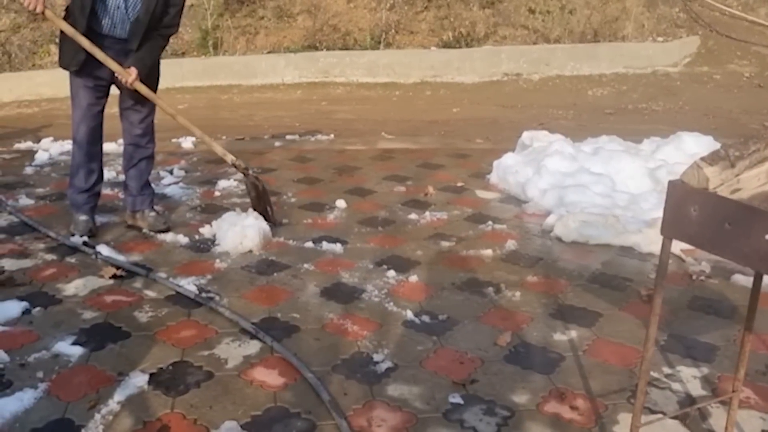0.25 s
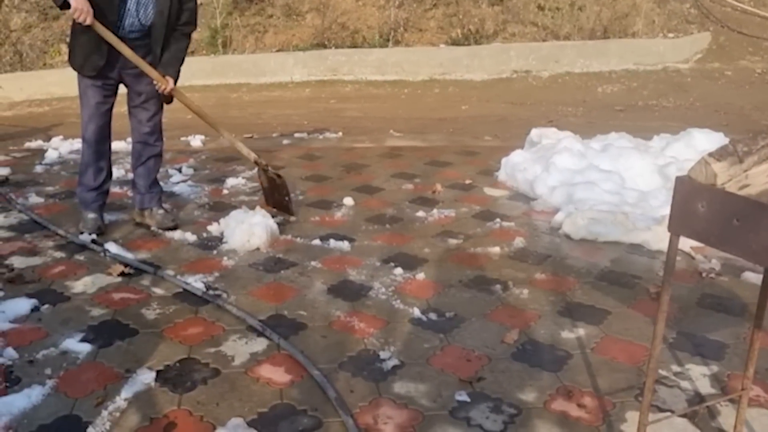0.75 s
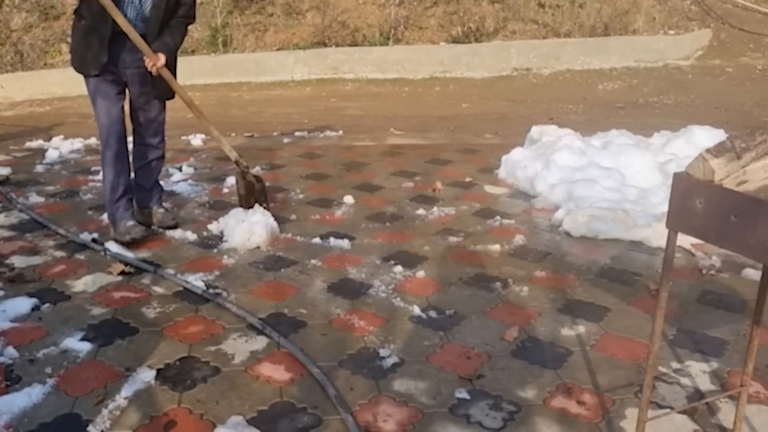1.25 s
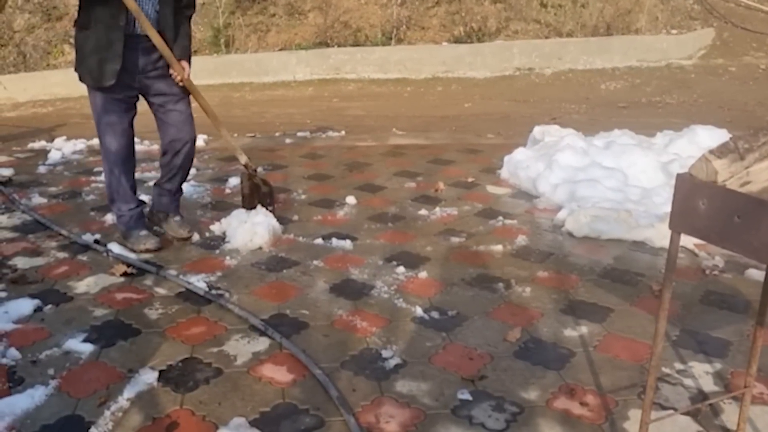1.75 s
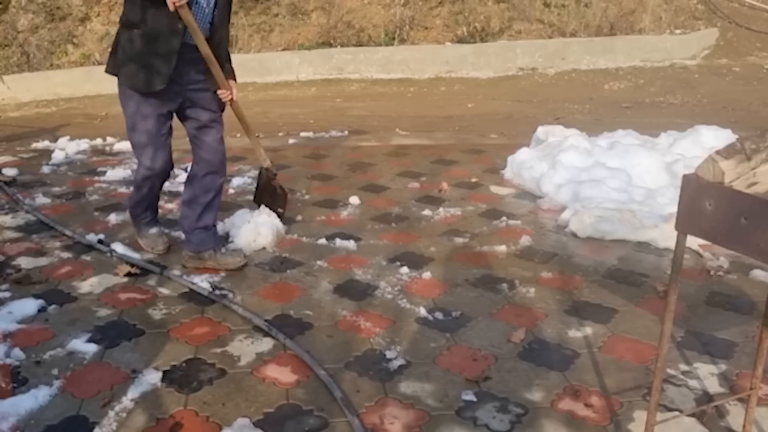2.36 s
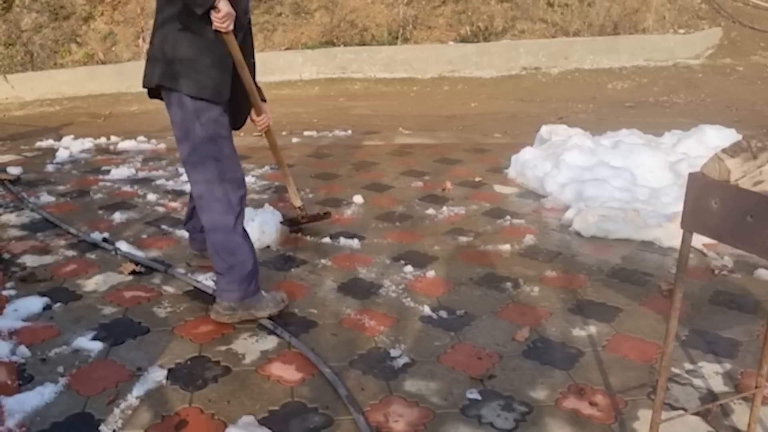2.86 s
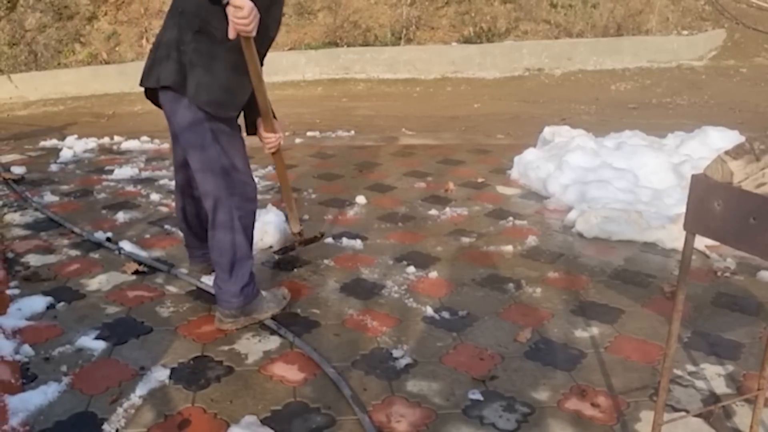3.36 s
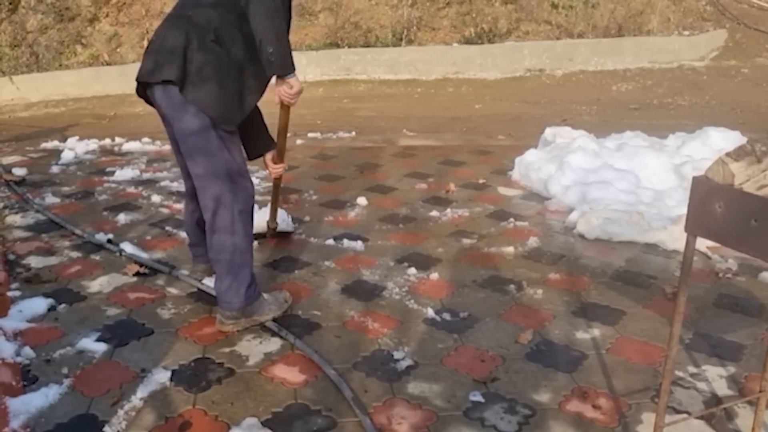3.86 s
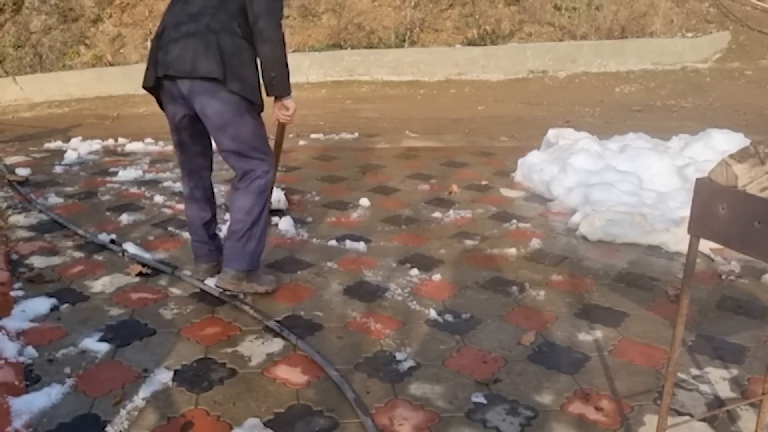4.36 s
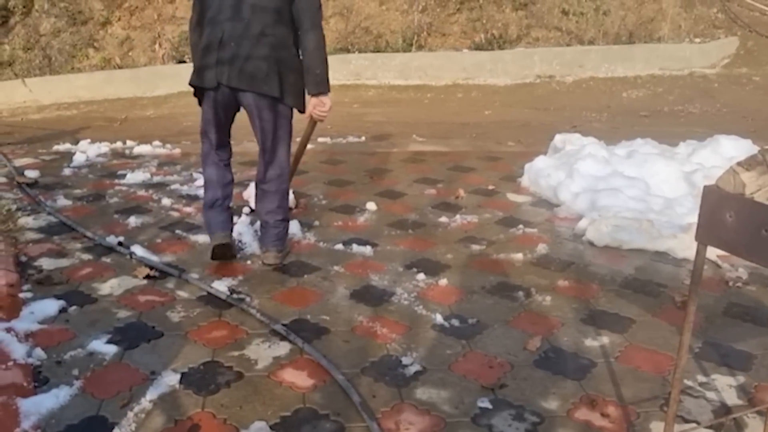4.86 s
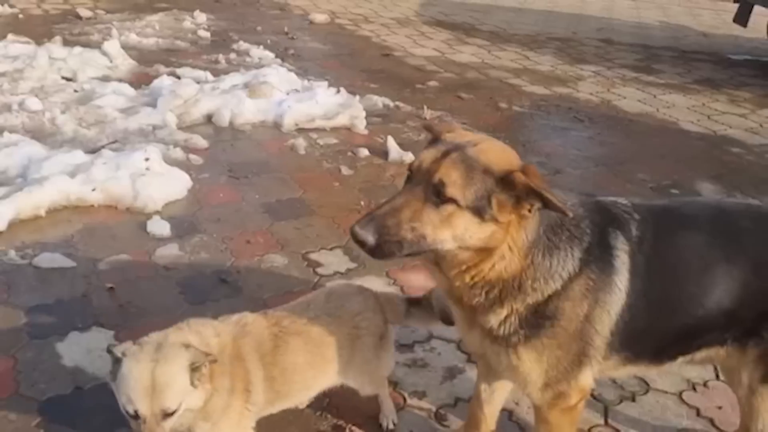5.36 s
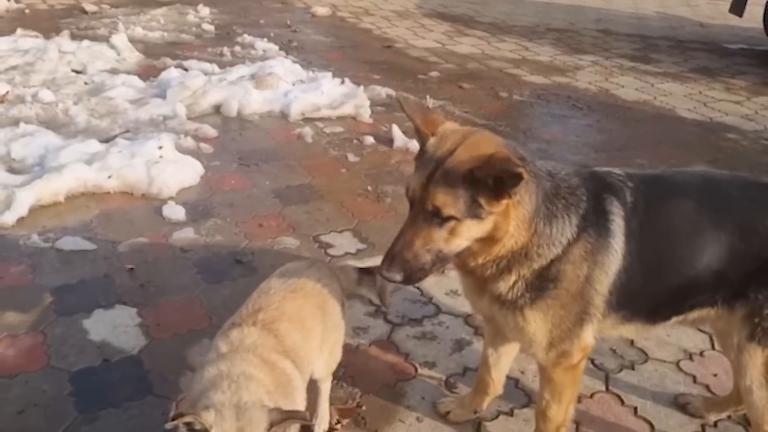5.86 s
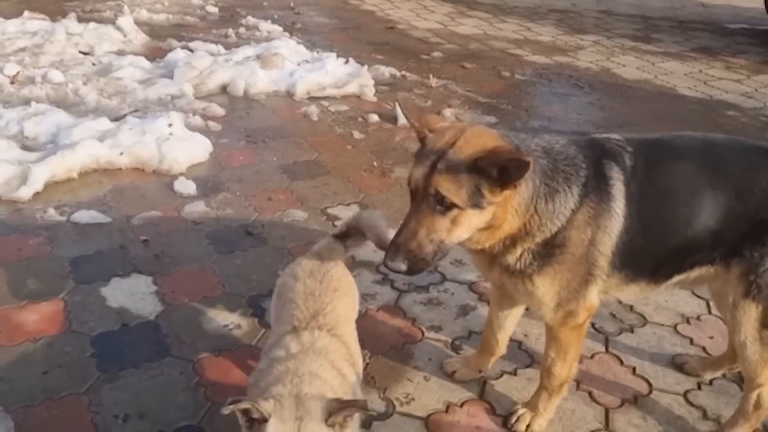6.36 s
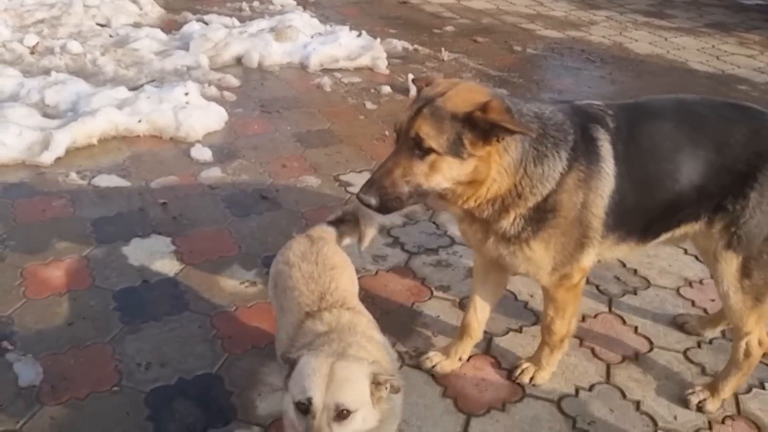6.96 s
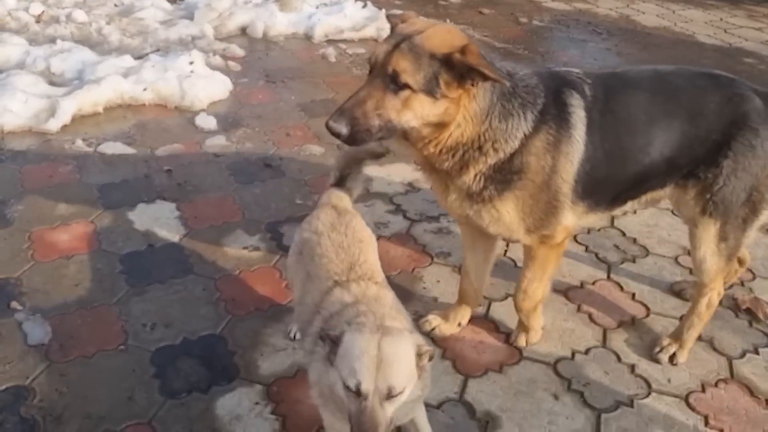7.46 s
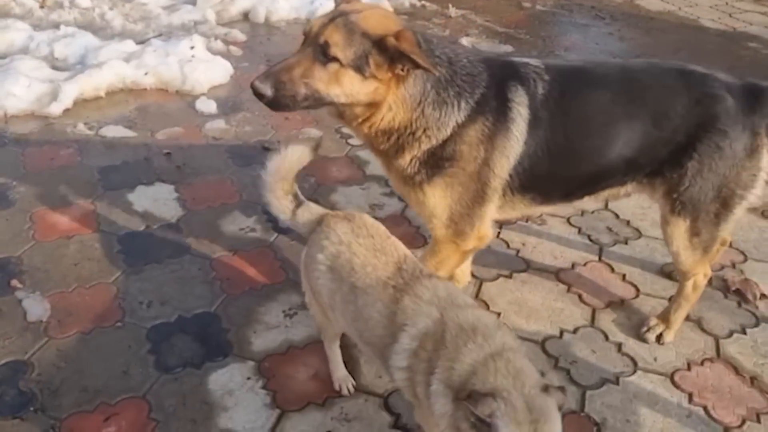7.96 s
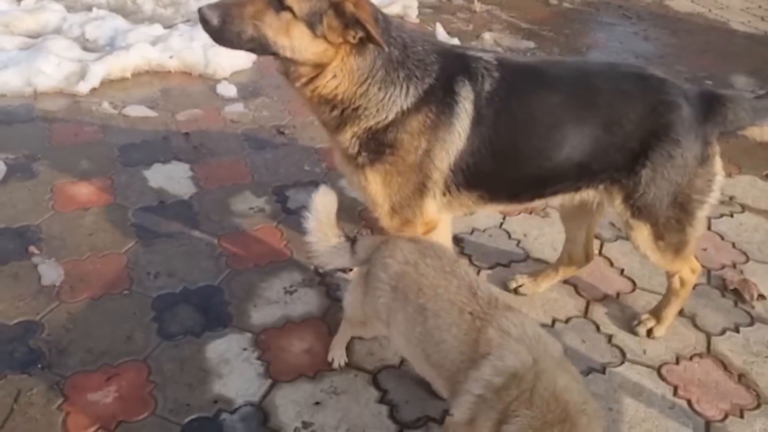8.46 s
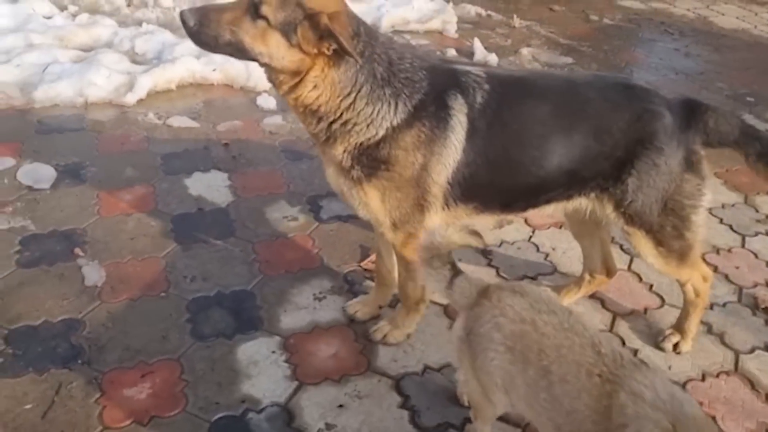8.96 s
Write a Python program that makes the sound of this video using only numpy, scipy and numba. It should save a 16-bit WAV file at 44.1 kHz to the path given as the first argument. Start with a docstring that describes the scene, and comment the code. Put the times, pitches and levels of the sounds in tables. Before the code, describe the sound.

Loud gritty shovel scrape on stone, then small crunches, a short ringing drag and more scattered scrapes, over soft wind outdoors.

```python
"""A steel shovel scrapes wet snow over paving stones in a yard, under a light wind and a distant hush.
From half a second in, a few steps away on one side, grit hisses and the edge jolts over joints and lumps.
Dull low thumps and crunches fall during and between strokes; from 2.4 to 4.4 s drags let the blade sing in
a sliding band. From 5.42 s the shovel is heard from farther round. Noise grains drive resonances of blade
and load; wind is low noise on two microphone ports that sit a hand's width apart on one body."""
import sys
import numpy as np
from scipy import signal
from scipy.fft import rfft, irfft, next_fast_len
from scipy.io import wavfile
from numba import njit

SR = 44100
rng = np.random.default_rng(int(sys.argv[2]) if len(sys.argv) > 2 else 0)


def materialize(psi):
    """Save the field psi as 16-bit PCM at rate SR to the path in sys.argv[1].

    A 1-D psi becomes a single channel; in a 2-D psi each row is a channel.
    """
    bounded = np.clip(np.atleast_2d(psi).T, -1, 1)
    quanta = np.round(bounded * 32767).astype(np.int16)
    wavfile.write(sys.argv[1], SR, quanta)


N = 406161
PAD = next_fast_len(N + SR // 2)  # FFT length with room for tails
HZ = np.maximum(np.arange(PAD // 2 + 1) * SR / PAD, 1)
TURN_S = 5.42  # from here the shovel is farther round


def from_db(db):
    """Amplitude ratio of a level: 20 dB for each factor of ten."""
    return 10 ** (np.asarray(db) / 20)


def rms_one(x):
    """Normalise by the root mean square, so that levels set the effective amplitude."""
    return x / np.sqrt(np.mean(x ** 2) + 1e-20)


def in_time(rows):
    """Linear interpolation of a (time [s], ...) table: one curve per column, one value per sample."""
    s, *columns = np.transpose(rows)
    return [np.interp(np.arange(N) / SR, s, column) for column in columns]


def at_hz(points, column=1):
    """Interpolation of a frequency table over log frequency, on the FFT grid."""
    points = np.array(points)
    return np.interp(np.log(HZ), np.log(points[:, 0]), points[:, column])


def colour(x, spectrum):
    """Minimum-phase filter: folding the cepstrum makes it causal; white noise keeps its rms."""
    magnitude = rms_one(from_db(at_hz(spectrum)))
    cepstrum = irfft(np.log(magnitude), PAD)
    cepstrum[1:PAD // 2] *= 2
    cepstrum[PAD // 2 + 1:] = 0
    response = np.exp(rfft(cepstrum))
    return irfft(rfft(x, PAD) * response, PAD)[..., :N]


def drift(rate):
    """Low-passed noise of rms 1: a double pole at rate [Hz] leaves only slow fluctuation."""
    r = np.exp(-40 * np.pi * rate / SR)  # computed at every 20th sample
    noise = rng.standard_normal(N // 20 + 2002)
    slow = rms_one(signal.lfilter([1], [1, -2 * r, r * r], noise)[2000:])
    return np.interp(np.arange(N) / 20, np.arange(len(slow)), slow)


def grains(per_s, spread_db):
    """Shot noise: random clicks of uneven size and either sign, scaled to rms 1."""
    sizes = from_db(spread_db * np.minimum(rng.exponential(1, N), 5))
    signs = rng.choice([-1, 1], N)
    return rms_one(sizes * signs * (rng.random(N) < per_s / SR))


@njit
def sliding(x, hz, q, sr):
    """State-variable band-pass with a centre that moves sample by sample; unit gain at resonance."""
    out, low, band = np.zeros(len(x)), 0., 0.
    for i in range(len(x)):
        g = np.tan(np.pi * hz[i] / sr)
        step = (x[i] - band * (1 / q + g) - low) * g / (1 + g / q + g * g)
        out[i] = (band + step) / q
        low += 2 * g * (band + step)
        band += 2 * step
    return out


def resonance(x, hz, width):
    """Damped oscillator: two poles whose radius sets the bandwidth; near unit gain at resonance."""
    r = np.exp(-np.pi * width / SR)
    poles = [1, -2 * r * np.cos(2 * np.pi * hz / SR), r * r]
    return signal.lfilter([1 - r, 0, r - 1], poles, x + 1e-18)


def yard_hush():
    """Broadband ambience: three independent coloured noises of rms 1."""
    # distant hush: (frequency [Hz], relative density [dB per Hz])
    hush_colour = [(71, -15), (120, -1), (222, -7), (327, -1), (445, -9), (684, -3), (968, -9.5),
                   (4230, -11), (7200, -21), (7980, -23), (8660, -79), (12800, -24), (16000, -65)]
    return colour(rng.standard_normal((3, N)), hush_colour)


def wind():
    """Turbulent pressure: lumpy low noise, only partly correlated between the two ports."""
    # course of the wind: (time [s], relative level [dB])
    wind_course = [(0.0, -62.5), (0.41, -49), (0.49, -61), (0.54, -51), (0.59, -56.5), (0.87, -51),
                   (0.92, -61.5), (1.79, -70.5), (1.87, -61.5), (3.51, -73), (3.67, -66), (3.72, -77),
                   (5.49, -64.5), (5.57, -73), (6.18, -70), (6.54, -86), (6.62, -62), (6.69, -71),
                   (7.57, -72), (7.75, -61), (7.77, -68.5), (8.31, -74.5), (8.54, -45.5), (8.57, -50),
                   (8.95, -67.5), (9.21, -50)]
    # wind noise at the ports: (frequency [Hz], relative density [dB per Hz])
    wind_colour = [(12, -9), (20, -11), (75, 2), (161, -27), (195, -50.5), (226, -64.5), (308, -25.5),
                   (348, -65.5), (500, -58.5), (650, -68), (1100, -120)]
    level_db, = in_time(wind_course)
    separate = rng.standard_normal((2, N))
    shared = .5 * rng.standard_normal(N)
    lumps = from_db(2.3 * np.array([drift(24), drift(12)]))
    gust_db = 1.5 * drift(7)
    lean_db = 4 * drift(2.4) * [[.5], [-.5]]  # gusts lean to one port
    rumble = rms_one(colour(separate + shared, wind_colour) * lumps)
    return rumble * from_db(level_db + 3.5 + gust_db + lean_db)


def thumps():
    """Damped free vibration: a soft low push rings as a decaying sine."""
    # dull low thumps: (time [s], level [dB], frequency [Hz], t60 [s])
    thump_list = [(.526, -13.5, 297.4, 0.051), (1.281, -46.5, 205, 0.068), (2.302, -38, 261, 0.067),
                  (2.857, -33, 247, 0.038), (3.647, -34, 243, .06), (3.758, -25.5, 198, 0.03),
                  (3.995, -48, 99, 0.15), (5.259, -45, 297, 0.065), (6.134, -38.5, 147, 0.056),
                  (6.6, -38, 98, 0.12), (6.652, -40, 174, 0.051), (7.994, -30.5, 304.6, .05),
                  (9.099, -45.5, 276, 0.069)]
    rise_s = 0.0014
    out, t = np.zeros(N + SR), np.arange(SR // 4) / SR
    for s, db, hz, t60 in thump_list:
        envelope = np.minimum(t / rise_s, 1) * from_db(db - 60 * t / t60)
        start = round(s * SR)
        out[start:start + len(t)] += envelope * np.sin(2 * np.pi * hz * t)
    return out[:N]


def drag():
    """Friction-driven resonance: dense grit excites bands that slide together as the blade tilts."""
    # drags that leave the blade free to sing: (time [s], band centre [Hz], relative level [dB])
    drag_course = [(2.45, 1147, -84), (2.55, 1165, -65), (2.65, 1110, -61.5), (2.75, 1032, -66.5),
                   (2.84, 998, -78), (2.88, 1372, -62.5), (2.95, 1230, -69), (3.03, 1225, -82),
                   (3.08, 1242, -78), (3.36, 1090, -78), (3.43, 1090, -50.5), (3.55, 1087, -37.5),
                   (3.7, 1166, -36.5), (3.8, 1193, -53), (3.9, 1147, -56.5), (3.98, 1119, -58.5),
                   (4.06, 1007, -61), (4.15, 918, -66), (4.24, 1045, -81), (4.36, 1007, -97)]
    # bands that slide together: (multiple of the centre [1], relative level [dB], sharpness Q [1])
    drag_bands = [(.58, 6, 8), (1, 8, 9), (3.3, 4, 11)]
    hz, level_db = in_time(drag_course)
    grit = grains(9000, spread_db=1.5)
    song = np.zeros(N)
    for multiple, db, q in drag_bands:
        song += from_db(db) * rms_one(sliding(grit, multiple * hz, 1. * q, SR))
    return from_db(level_db) * song


def rubbing():
    """Friction noise envelopes: gains of grit, fine grit, slush and spray under strokes and scuffs."""
    # long strokes, one curve each: (time [s], relative grit level [dB],
    # fine grit [dB above grit], slush [dB above grit], spray [dB above grit])
    stroke_curves = [
        [(0.5, -90, 12, 14, -15), (0.53, -20.5, -6.5, -9.5, -20), (0.572, -42, -8, 12, -22),
         (0.596, -21.5, -12, -5.5, -23.5), (0.732, -21.5, -8, -4, -18), (0.752, -34.5, -9, 9, -21),
         (0.764, -24.5, -1, -3, -15), (0.792, -25, -7, -1, -14.5), (0.944, -60.5, 0.5, 8.5, -17),
         (1.02, -71.5, -10, -21, -19.5)],
        [(2.4, -66, -6, 5, -21), (2.58, -57, 9, 2, -12), (2.712, -52, -2, 5.5, -14),
         (2.73, -39.5, -3.5, 1.5, -22), (2.806, -60, 7, 3, -7), (2.85, -54, 2, 2, -9),
         (2.882, -32, -22, -18, -43), (2.902, -55.5, 4, 10, -4), (2.956, -39, -2, -1, -9.5),
         (3.08, -64.5, -2, 2.5, -23)],
        [(3.3, -56, 3, 2, -15), (3.32, -95, -4, 0, 1), (3.334, -46, -10.5, 0.5, -16),
         (3.378, -51.5, 1.5, -11, -17), (3.484, -33.5, 0, 4.5, -13), (3.584, -29, 4.5, -6, -10),
         (3.604, -21, -2, -14, -15), (3.628, -28, 5, 6.5, -6.5), (3.748, -27.5, -4.5, 1.5, -19),
         (3.84, -48.5, -2, 7, -18)],
        [(3.84, -47, -3, -9, -18), (3.918, -52, 8, -6, 2), (3.934, -54.5, 6, 2, -7), (3.956, -48, 7.5, -8, -5),
         (4.038, -62, -5, 2, -14), (4.064, -51, 3.5, -12, -9), (4.144, -57, -9, 1, -24),
         (4.162, -58.5, 5.5, 2, -16.5), (4.35, -63, -2, 2, -22), (4.42, -67, -6, 8, -40.5)],
        [(6.16, -52, 2, 2, -20), (6.172, -61, -2.5, -2.5, -20), (6.334, -44, -2, -19, -19),
         (6.394, -37.5, -4.5, -9, -19.5), (6.484, -49, 7, -15.5, -10), (6.52, -37.5, -4.5, -36, -16.5),
         (6.614, -36.5, -0.5, -8, -18.5), (6.746, -48.5, -3.5, -15, -19), (6.816, -55, 2.5, -1, -9),
         (6.84, -44, -4, -6, -25)],
        [(7.68, -58, -3, -4.5, -25), (7.742, -45.5, -1.5, -10, -20), (7.804, -39, -4.5, -6, -21),
         (7.824, -49.5, -1, -4.5, -17), (7.876, -37, 1, -4.5, -19), (7.932, -33, -1, 0, -18),
         (7.98, -31.5, 0, -3.5, -16), (7.996, -21, -10, -5.5, -20), (8.004, -30, 4, 9, -17),
         (8.02, -35, 5, -3, -15)],
        [(8.02, -27.5, 0, -6, -20), (8.036, -30, -1, -4, -15), (8.14, -27.5, -4, -2.5, -22),
         (8.24, -46, -1.5, -4.5, -19), (8.286, -60, 4.5, -6.5, -7), (8.422, -59, 2, -13, -8.5),
         (8.454, -45, -18, -19, -30), (8.5, -85.5, 8, -7, 1)],
    ]
    # short scuffs: (start [s], hold [s], fade t60 [s], relative grit level [dB],
    # fine grit [dB above grit], slush [dB above grit], spray [dB above grit])
    scuff_list = [(0, 0.062, 1.05, -62.5, -0.5, -6, -14), (1.153, 0.042, 0.5, -50, -2.5, -1, -21),
                  (1.258, 0.017, 0.17, -66.5, -7, 1, -23), (1.402, 0.048, 0.18, -59.5, -3, 1, -19),
                  (1.468, 0.013, 0.29, -45.5, -5, 12, -21), (1.578, .07, .15, -61, 8, 0, -6),
                  (1.698, 0.056, 0.22, -53.5, -7, 6.5, -18), (1.828, .03, 0.16, -58.5, 7, 2.5, -4.5),
                  (1.888, 0.053, .2, -61, -6, 8.5, -30), (1.952, 0.045, 0.17, -48, 1.5, 6, -16),
                  (2.038, 0.073, 0.47, -58, 1, -9.5, -16), (2.298, 0.095, 0.12, -57.5, -3, 3.5, -23.5),
                  (3.115, .14, 0.1, -51, -6.5, -9.5, -18), (4.439, 0.08, 0.19, -55.5, 12.5, 3, -3.5),
                  (4.638, 0.067, 0.29, -56, -5, -1, -25.5), (4.978, 0.028, 0.94, -64, -8, -1.5, -25.5),
                  (5.173, 0.077, 0.22, -52.5, 2, -3, -15), (5.258, 0.083, 0.87, -50.5, -16, -4.5, -21),
                  (5.588, 0.095, 0.39, -60, 5.5, -10.5, -10.5), (5.818, 0.026, 0.11, -61.5, 3, -14, -22),
                  (6.043, 0.063, 0.19, -43, -2.5, -11, -24), (6.831, 0.035, 0.56, -49.5, -3, -1, -17),
                  (6.998, 0.18, 0.14, -45.5, -6, -10.5, -22), (7.2, 0.043, 0.34, -65, 5.5, 1.5, -15.5),
                  (7.56, 0.029, 0.48, -47.5, -5, -10.5, -23), (8.884, 0.014, 0.13, -62.5, 13.5, -3.5, -5.5),
                  (9.028, 0.04, 0.21, -52.5, 3.5, 3, -20), (9.099, 0.027, 0.32, -48.5, -6.5, 1, -23)]
    rise_s = 0.014
    t, out = np.arange(N) / SR, np.zeros((4, N))

    def layers(grit_db, fine_db, slush_db, spray_db):
        """Level addition: four gains from one level and three offsets."""
        return from_db([grit_db, grit_db + fine_db, grit_db + slush_db, grit_db + spray_db])

    for rows in stroke_curves:
        out += layers(*in_time(rows)) * (t >= rows[0][0]) * (t < rows[-1][0])
    for s, hold, fade, grit_db, *above_db in scuff_list:
        at = slice(round(max(s, 0) * SR), round((s + hold + fade) * SR))
        since = t[at] - s
        shape = np.clip(since / rise_s, 0, 1) ** 2
        fall_db = -60 * np.maximum(since - hold, 0) / fade
        out[:, at] += shape * layers(grit_db + fall_db, *above_db)
    return out


def jolts(lumps, rise, thud_longer, knock_db, knock_q):
    """Impact: a first tick, envelopes of crack, thud and fine top, and a resonant knock; lows last longer."""
    # jolts and crunches: (time [s], relative level [dB], thud [relative dB above the crack],
    # thud frequency [Hz], fine top [dB above the crack], crack t60 [s])
    jolt_list = [(0.5254, -9, -3.5, 308, -32, 0.037), (0.5821, -10.5, -17, 254, -21, 0.032),
                 (0.596, -22, -11, 318, -35, 0.028), (0.6937, -20, -17, 550, -24, 0.017),
                 (0.7224, -4, -15, 260, -28, 0.032), (0.7647, -4.5, -9.5, 1330, -25, 0.021),
                 (0.7774, -6, -21, 546, -28, 0.031), (0.7888, -0.5, -29, 363, -35, 0.022),
                 (0.822, -9, -16.5, 387, -20, 0.062), (0.8548, -19.5, -9.5, 715, -18, 0.061),
                 (1.1568, -36.5, -25, 581, -16, 0.041), (1.282, -29, -12.5, 300, -20, 0.015),
                 (1.327, -41.5, -19.5, 323, -41, 0.083), (1.4032, -40.5, -3.5, 245, -37, 0.033),
                 (1.432, -38, -8, 350, -37, 0.075), (1.48, -27, -11, 606, -46, 0.031),
                 (1.496, -26.5, -4.5, 596, -41, 0.02), (1.6217, -41.5, -12, 1150, -4, 0.091),
                 (1.6781, -18.5, -19.5, 310, -28, 0.058), (1.7087, -12.5, -13, 545, -26, 0.025),
                 (1.7504, -50, 6, 1280, -33, 0.032), (1.7663, -27.5, -22, 1230, -36, 0.023),
                 (1.799, -41, -15, 544, -29, 0.045), (1.831, -33, -11.5, 218, -25, 0.023),
                 (1.9797, -29.5, -21.5, 1390, -31, 0.08), (2.0681, -32.5, -22, 323, -17, 0.012),
                 (2.0925, -42, -22, 228, -21, 0.035), (2.1311, -41.5, -7, 256, -27, 0.042),
                 (2.2998, -34.5, 1.5, 294, -39, 0.074), (2.345, -36, -17, 1130, -34, 0.069),
                 (2.3885, -44.5, -2, 535, -31, 0.035), (2.4713, -48, 3, 544, -18, 0.11),
                 (2.5597, -33, -23, 1340, -31, 0.04), (2.5874, -44, 0.5, 662, -31, 0.044),
                 (2.6544, -37, -16, 697, -23, 0.065), (2.723, -30, -21, 654, -29, 0.045),
                 (2.7474, -33, -18, 1140, -27, 0.02), (2.8576, -33.5, -4.5, 260, -35, 0.035),
                 (2.8769, -25, -33, 1370, -37, 0.012), (3.0893, -35.5, -13, 242, -40, 0.038),
                 (3.1288, -35.5, -12, 581, -42, 0.025), (3.2054, -34, -9, 660, -13, 0.035),
                 (3.3313, -22, -9, 560, -21, 0.049), (3.407, -16.5, -10.5, 665, -23, 0.05),
                 (3.4632, -17.5, -25, 1110, -21, 0.042), (3.476, -18, -11, 619, -23, 0.028),
                 (3.5363, -6.5, -10.5, 600, -21, 0.029), (3.6044, -1, -5, 614, -32, 0.012),
                 (3.6198, -3, -11.5, 1080, -28, 0.012), (3.648, -9.5, -8, 330, -26, 0.023),
                 (3.7616, -31, 2, 1160, -37, 0.018), (3.8896, -34, -22, 1300, -12, 0.028),
                 (4.2437, -35.5, -16, 1160, -35, 0.028), (4.4377, -37.5, -11.5, 686, -16.5, 0.026),
                 (4.4523, -45.5, -8, 640, -27, 0.051), (4.5156, -33, -36, 530, -32, 0.041),
                 (4.562, -39, -8, 316, -40.5, 0.044), (4.677, -32.5, -28.5, 600, -46, 0.029),
                 (5.1794, -43, -7, 533, -30.5, 0.028), (5.2593, -36.5, 0.5, 387, -24, 0.035),
                 (5.279, -39, 1, 330, -19, 0.047), (5.3234, -54.5, 13.5, 506, -28, 0.028),
                 (5.5934, -39, -19, 649, -25, 0.11), (5.7029, -57, -21, 342, -32, 0.025),
                 (5.7274, -38.5, -28, 606, -29, 0.024), (5.8162, -33, -13.5, 614, -36, 0.02),
                 (5.9485, -50, -2, 393, -35.5, 0.012), (5.9667, -70, 12, 358, -25.5, 0.022),
                 (5.9846, -59, 6.5, 956, -36.5, 0.028), (6.0542, -39, -24, 444, -20.5, 0.024),
                 (6.0885, -19.5, -20.5, 410, -45, 0.051), (6.132, -20, -12, 260, -41, 0.032),
                 (6.3794, -16.5, -17, 462, -32, 0.033), (6.399, -22, -12, 353, -29, 0.038),
                 (6.5221, -24, -37, 1380, -27, 0.047), (6.6065, -29.5, -11, 415, -29, 0.042),
                 (6.8365, -25.5, -37, 358, -32, 0.05), (6.8472, -23, -27, 277, -18.5, 0.039),
                 (6.888, -33, -14, 382, -33, 0.047), (6.9288, -34.5, -27, 326, -31, 0.06),
                 (6.996, -20, -26.5, 441, -25, 0.061), (7.014, -24, -36, 428, -22, 0.11),
                 (7.0541, -26, -36, 756, -21, 0.015), (7.158, -25, -19, 450, -34, 0.013),
                 (7.2127, -29.5, -28, 377, -26, 0.025), (7.312, -41.5, -21.5, 544, -23, 0.038),
                 (7.329, -43, -25, 296, -36, 0.027), (7.3876, -43.5, -33, 417, -41, 0.028),
                 (7.4618, -36.5, -19, 506, -35, 0.076), (7.5028, -42, -19, 783, -30.5, 0.042),
                 (7.587, -23.5, -25, 1120, -47, 0.035), (7.7157, -35, -4.5, 1390, -13, 0.07),
                 (7.7318, -25.5, -15.5, 740, -15, 0.072), (7.7573, -22, -28, 514, -37, 0.038),
                 (7.9904, -18, -10, 684, -24, 0.023), (8.098, -11, -22, 1060, -25, 0.025),
                 (8.1321, -17, -2.5, 730, -40, 0.013), (8.4495, -34, -25, 323, -38, 0.024),
                 (8.8937, -44.5, -29, 1335, -21, 0.031), (9.0317, -31.5, -25, 390, -43.5, 0.045),
                 (9.0949, -28, -10, 388, -39, 0.079)]
    out, t = np.zeros((5, N + SR)), np.arange(SR // 5) / SR
    lumps = np.pad(lumps, (0, SR))
    ticks_db = 11.5 + 3 * rng.standard_normal(len(jolt_list))  # each tick above its jolt's level
    for (s, db, thud_db, thud_hz, top_db, t60), tick_db in zip(jolt_list, ticks_db):
        start = round(s * SR)
        at = slice(start, start + len(t))
        swell = np.sin(np.pi / 2 * np.minimum(t / rise, 1)) ** 2 * from_db(db - 6.5)
        fall_db = -60 * np.maximum(t - rise, 0) / max(t60, .004)
        thud = swell * from_db(thud_db - 2.0 + fall_db / thud_longer)
        knock = resonance(thud * lumps[at], thud_hz, thud_hz / knock_q)
        out[0, at] += swell * from_db(fall_db)
        out[1, at] += thud
        out[2, at] += swell * from_db(top_db + fall_db)
        out[3, at] += from_db(knock_db) * knock / np.sqrt(thud_hz / SR)  # evens out the bandwidth
        out[4, start + round(rise * SR / 2)] = from_db(db + tick_db)
    return out[:, :N]


def blade(low_drive, high_drive, grip_db):
    """Modal superposition: where the edge touches decides, moment to moment, how much each mode is driven."""
    # blade and shaft modes: (frequency [Hz], width [Hz], relative level [dB])
    blade_modes = [(323, 50, 0), (577, 60, 0), (698, 60, -3), (1094, 40, 0), (1208, 45, -2), (1370, 70, -5),
                   (1900, 90, -7), (2390, 50, 0), (2610, 70, -5), (2950, 60, -4), (3214, 70, -4),
                   (3446, 60, -3), (3730, 60, -1), (4268, 40, 2), (4532, 70, -4), (4890, 80, -5),
                   (5400, 100, -6), (6400, 120, -8)]
    out = np.zeros(N)
    for k, (hz, width, db) in enumerate(blade_modes):
        drive = low_drive if hz < 1600 else high_drive
        driven = drive * from_db(db + grip_db * drift(18))
        out += (-1) ** k * resonance(driven, hz, width)
    return out


def shovel():
    """Source and resonator: rubbing and jolts drive grains, and these the blade and the hollow under the load."""
    # how the load sits on the blade: (time [s], relative blade ring [dB],
    # high modes [relative dB], hollow frequency [Hz], relative hollow level [dB])
    load_course = [(0, -16, -8, 650, 11), (.55, 1.5, 3, 500, 8), (.7, -5.5, 10.5, 500, -2),
                   (.9, -1.5, 2, 587, 6.5), (1.5, -9.5, -3.5, 610, 3), (2.3, -0.5, 2, 700, 10),
                   (2.7, -4.5, -2.5, 635, 13.5), (3.0, -6, -5, 1100, -1.5), (3.35, 2.5, 2, 634, 19),
                   (3.6, -2.5, -2, 990, 7), (3.8, -12, -0.5, 1120, 12), (4.1, -1.5, 6.5, 820, 15),
                   (4.5, -3.5, -2.5, 706, 3.5), (5.3, -8, 0, 398, 14), (6.1, -0.5, -1, 500, 14.5),
                   (6.6, 5.5, -6, 480, 15.5), (7.1, 2.5, 2, 610, 13.5), (7.8, 2, 1, 750, 16),
                   (8.2, -1.5, 0.5, 724, 12), (9.2, 7, 2, 486, 7)]
    # hiss of grit: (frequency [Hz], relative density [dB per Hz])
    grit_colour = [(800, -25.5), (1400, -9), (2000, -2.5), (2800, 7), (3500, 3), (4500, -3.5),
                   (6500, -26.5)]
    # hiss of fine grit: (frequency [Hz], relative density [dB per Hz])
    fine_colour = [(2200, -23.5), (3200, -4), (3900, -4.5), (5000, 2), (6000, -5), (7200, -5.5),
                   (8200, -12), (9200, -34)]
    # wash of slush: (frequency [Hz], relative density [dB per Hz])
    slush_colour = [(70, -23.5), (140, -17.5), (250, 0), (400, -0.5), (650, 13.5), (1000, -13), (1500, 9),
                    (2200, 5), (3500, -88.5)]
    # spray: (frequency [Hz], relative density [dB per Hz])
    spray_colour = [(7500, -58), (9000, -5), (10500, -5), (12500, 4), (14500, 1), (16000, -6.5)]
    grit_gain, fine_gain, slush_gain, spray_gain = rubbing()
    ring_db, high_db, hollow_hz, hollow_db = in_time(load_course)

    sand = grains(9000, spread_db=3.5)
    lumps = grains(3000, spread_db=2.5)
    judder = from_db(1.5 * drift(45))
    crack, thud, top, knocks, ticks = jolts(lumps, rise=.0025, thud_longer=1.3, knock_db=3, knock_q=2.5)
    cracks = from_db(-12.5) * (sand * crack + ticks)
    rubbed_sand = from_db(-4.0) * sand * judder
    grit = rubbed_sand * grit_gain + cracks
    fine = rubbed_sand * fine_gain + cracks
    rubbed_slush = from_db(-1.0) * lumps * slush_gain * judder
    slush = rubbed_slush + lumps * thud
    spray = sand * (from_db(3.0) * spray_gain * judder + top)

    ring_db = ring_db + 5 * drift(7.1)  # the ring changes with the grip
    ring_db -= 6 * (np.arange(N) > TURN_S * SR)  # the blade faces away and rings less
    modes = blade(from_db(5.5) * slush, from_db(high_db) * (grit + fine), grip_db=7.0)
    ringing = from_db(ring_db) * modes

    hollow_hz = hollow_hz * 2 ** (.15 * drift(3.6))  # wanders, in octaves
    hollow_gain = from_db(hollow_db + 6 * drift(3.4))
    hollow = hollow_gain * sliding(rubbed_slush, hollow_hz, 3.6, SR)

    hiss = from_db(2.0) * colour(grit, grit_colour) + from_db(2.5) * colour(fine, fine_colour)
    hiss += colour(spray, spray_colour)
    wash = from_db(-5.5) * colour(slush, slush_colour)
    return hiss + wash + ringing + hollow + knocks


def scatter(x, smear_t60, turns):
    """Diffuse reflection: short decaying smears, unlike at each port, blend over as the source moves."""
    # share scattered by the yard and the hand: (frequency [Hz], level [dB])
    scatter_share = [(100, -15), (500, -11), (1400, 2), (3000, -6), (6000, -2), (9000, 2), (16000, 2)]
    t = np.arange(SR // 8) / SR
    smear = rng.standard_normal((3, 2, len(t))) * from_db(-60 * t / smear_t60)
    smear /= np.sqrt(np.sum(smear ** 2, axis=2, keepdims=True))
    a, b = turns * np.array([drift(5), drift(5)])  # [rad]
    shares = [np.cos(a) * np.cos(b), np.cos(a) * np.sin(b), np.sin(a)]  # squares sum to 1
    echoes = sum(rfft(x * share, PAD) * rfft(pattern, PAD) for share, pattern in zip(shares, smear))
    return echoes * from_db(at_hz(scatter_share))


def ports(x, table):
    """Diffraction and delay: the body shades each port in its own way and the right one hears later."""
    # colour shared by both ports: (frequency [Hz], level [dB])
    port_colour = [(60, -5.5), (150, -0.5), (300, 3), (6000, 0), (7500, -6), (8800, -18), (10000, -15),
                   (12000, -5)]
    lag = np.interp(HZ, *np.array(table)[:, [0, 2]].T)
    shade = from_db(at_hz(table) * [[.5], [-.5]] + at_hz(port_colour))
    heard = rfft(x, PAD) + scatter(x, smear_t60=.025, turns=3)
    return irfft(shade * heard * np.exp(-1j * lag * [[0], [1]]), PAD)[:, :N]


def scene():
    """Superposition: shovel and hush reach the ports from one side, then from farther round; wind adds to it."""
    # the two ports, shovel near: (frequency [Hz], left above right [dB], right lags [rad])
    ports_near = [(100, 1, .2), (340, -4, .9), (520, 3, 1.5), (780, -1, 1.9), (1030, 7, 2.6),
                  (1550, -1, 2.5), (2070, -6, 3.3), (2750, -5, 4), (3450, -11, 4.2), (4300, -9, 7.4),
                  (5300, -10, 9.4), (5800, -6, 10.2), (6400, 3, 11), (7750, 6, 12.8), (9050, 14, 15),
                  (10300, 13, 17), (12000, 3, 19), (16000, 1, 25)]
    # the two ports, shovel farther round: (frequency [Hz], left above right [dB], right lags [rad])
    ports_far = [(100, 1, .5), (340, 2, 1.3), (520, 1, 2), (780, 2, 2.4), (1030, -2, 2.8), (1550, -6, 3.8),
                 (2070, -10, 5.7), (2750, -5, 8), (3450, -12, 9.7), (4300, -9, 14.1), (5300, -11, 17.8),
                 (5800, -6, 19.3), (6400, 10, 21), (7750, 9, 24), (9050, 14, 28), (10300, 10, 33),
                 (12000, 4, 40), (16000, 7, 52)]
    # ground echo and shading from farther round: (frequency [Hz], relative level [dB])
    far_colour = [(100, -3), (180, 0.5), (400, 2), (800, 0.5), (1300, 1.5), (2000, -1.5), (3200, 0),
                  (4500, 2.5), (6000, -7), (13000, 1.5)]
    near = np.arange(N) < TURN_S * SR
    hush = yard_hush()
    source = from_db(-67.5) * hush[0] + thumps() + drag() + shovel()
    near_sound = ports(source * near, ports_near)
    far_sound = ports(colour(source * ~near, far_colour), ports_far)
    return from_db(-66.5) * hush[1:] + wind() + near_sound + far_sound


def record(dry):
    """Saturation and band limit: tanh rounds the peaks, a steep low-pass cuts the top."""
    rounded = np.tanh(dry / 1.1) * 1.1
    low_pass = signal.cheby2(16, 80, 15800 * 1.03, fs=SR, output="sos")  # 80 dB down at this edge [Hz]
    return signal.sosfilt(low_pass, rounded)


dry = scene()
out = record(dry)
materialize(out)
```